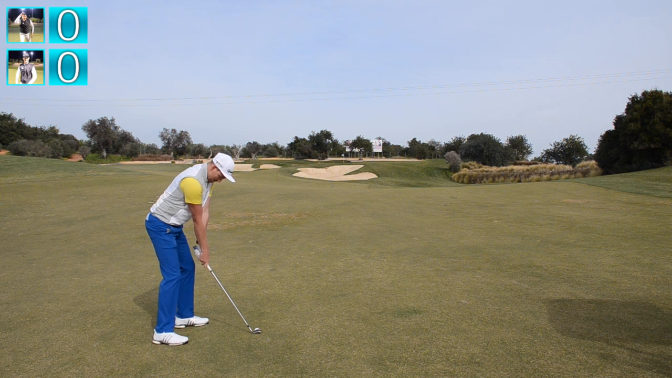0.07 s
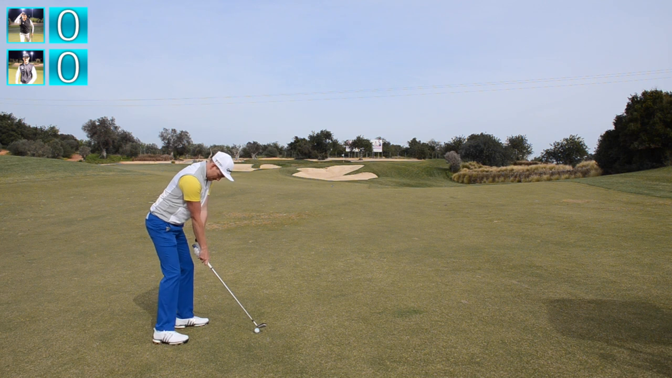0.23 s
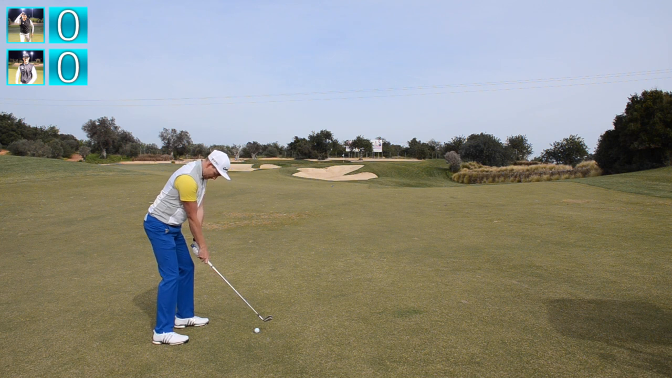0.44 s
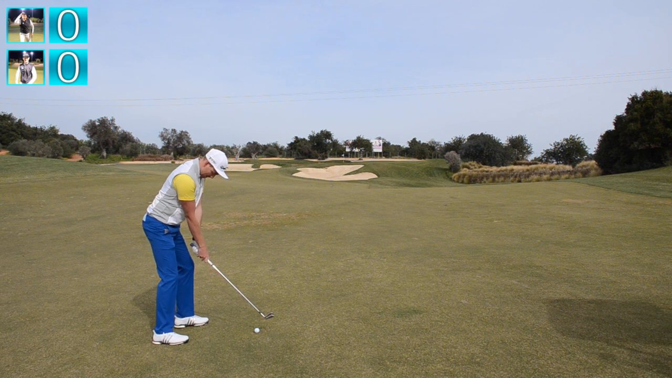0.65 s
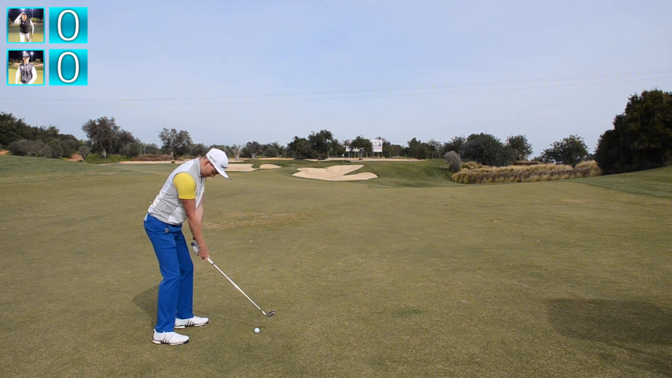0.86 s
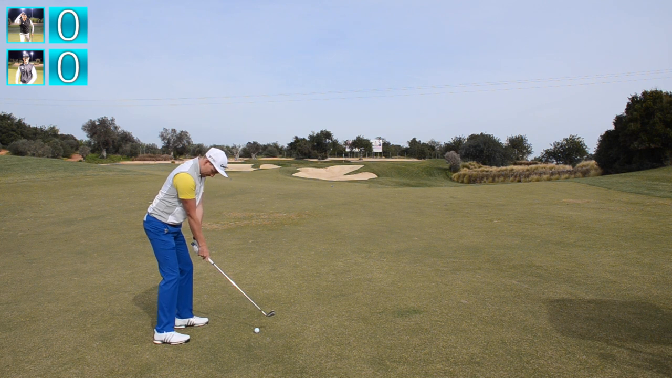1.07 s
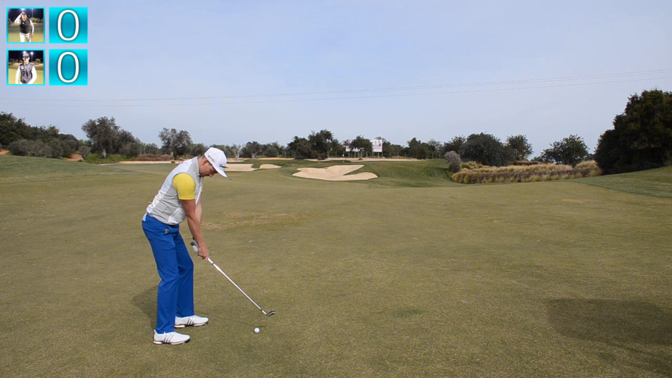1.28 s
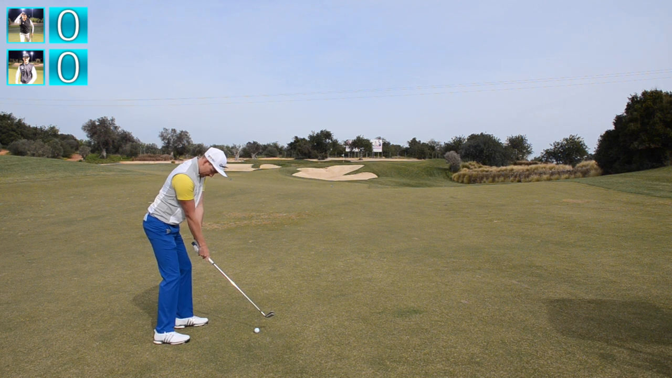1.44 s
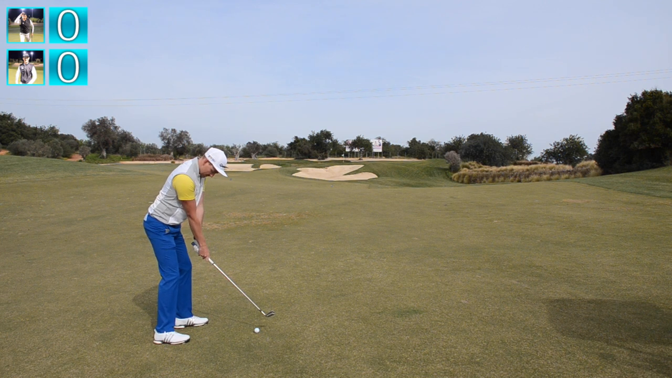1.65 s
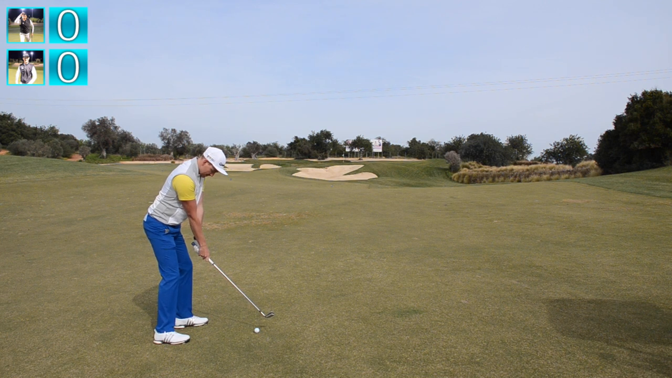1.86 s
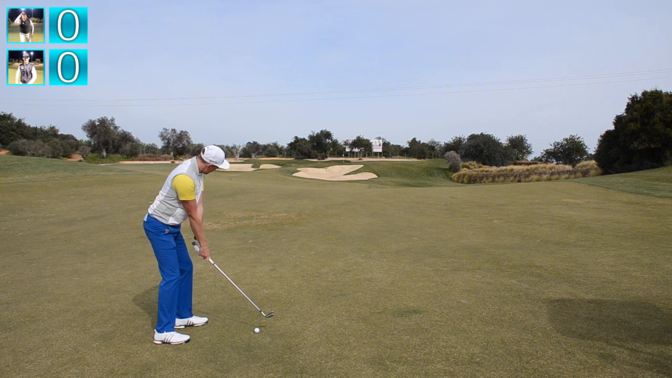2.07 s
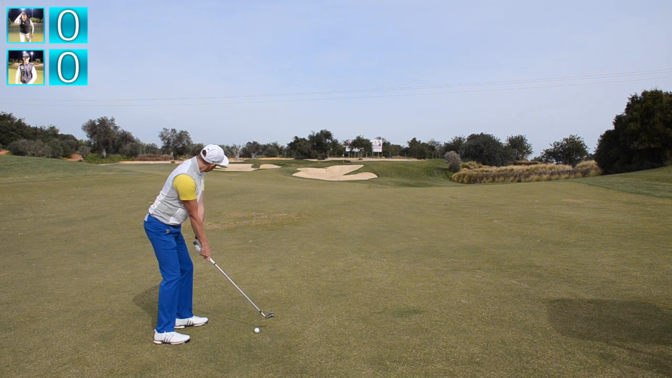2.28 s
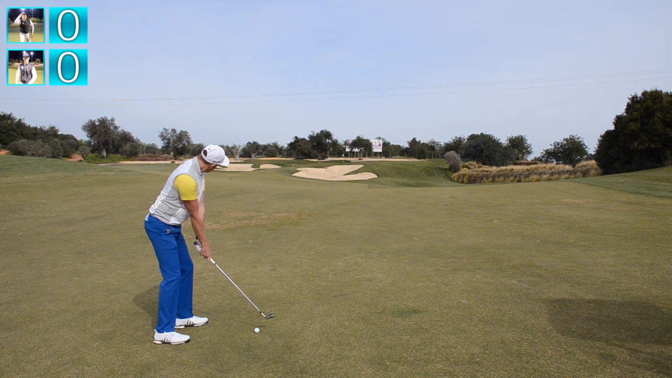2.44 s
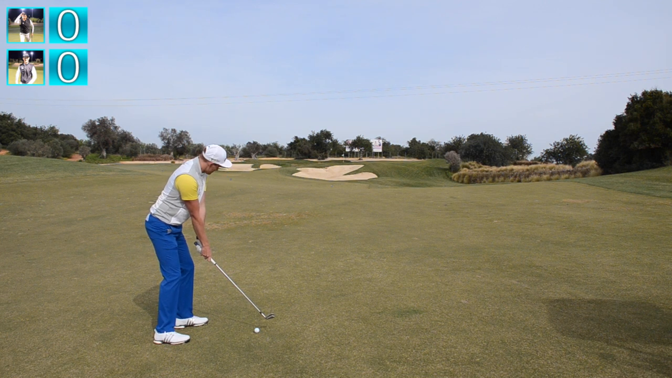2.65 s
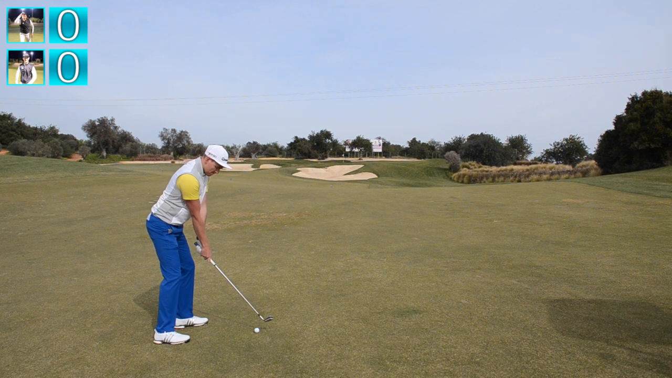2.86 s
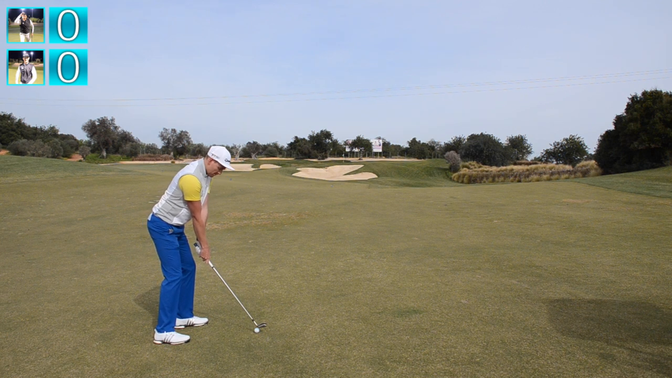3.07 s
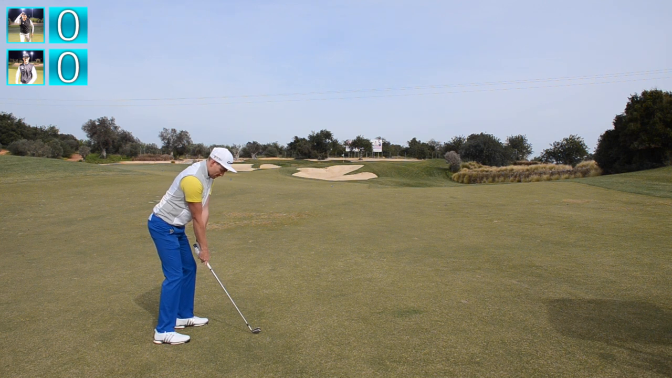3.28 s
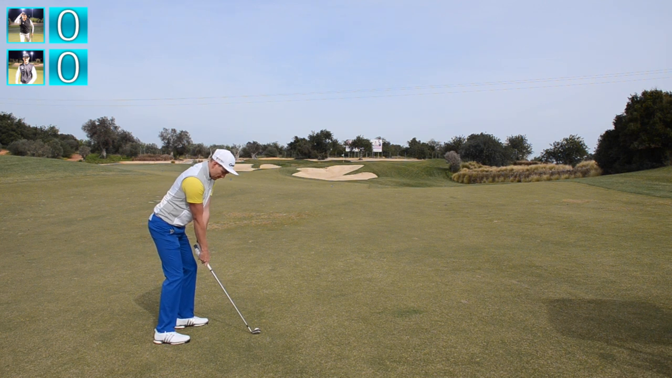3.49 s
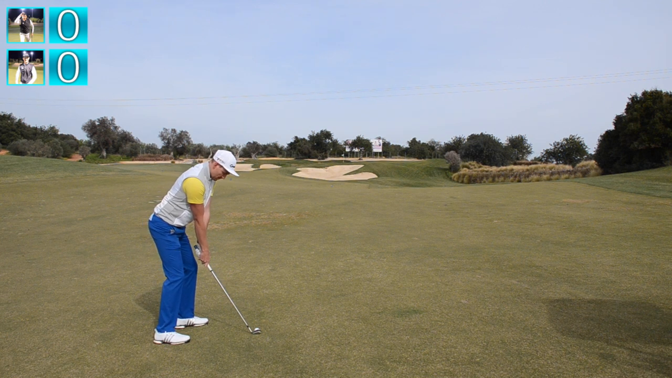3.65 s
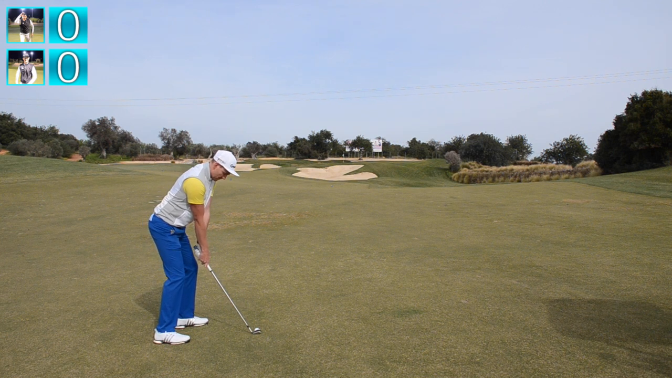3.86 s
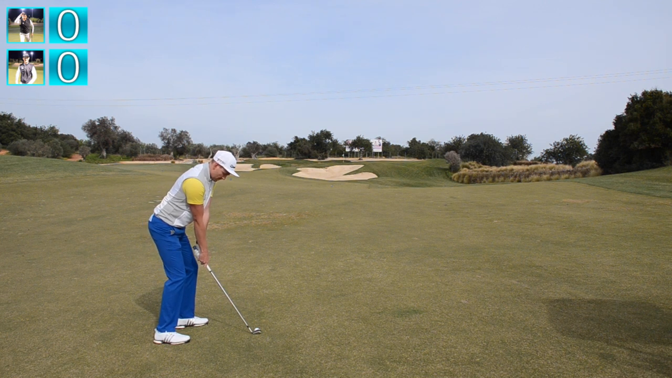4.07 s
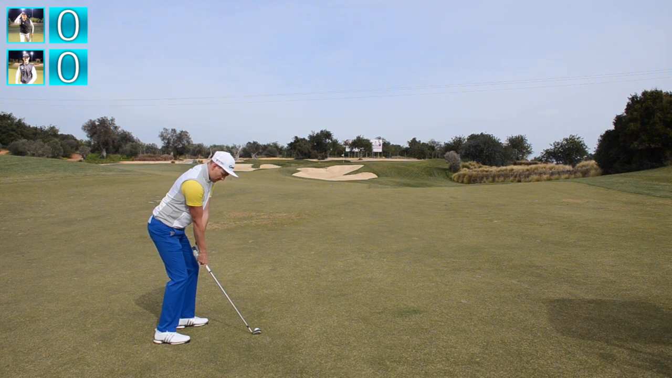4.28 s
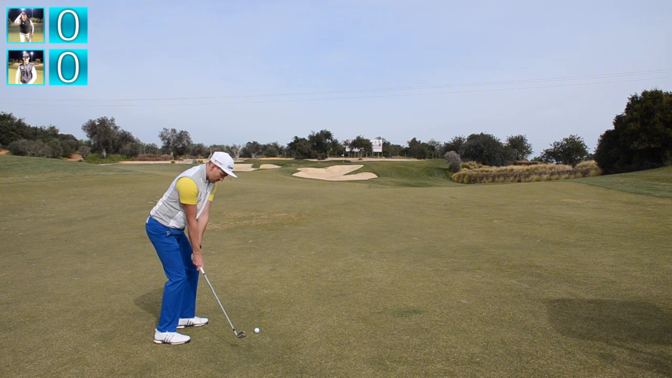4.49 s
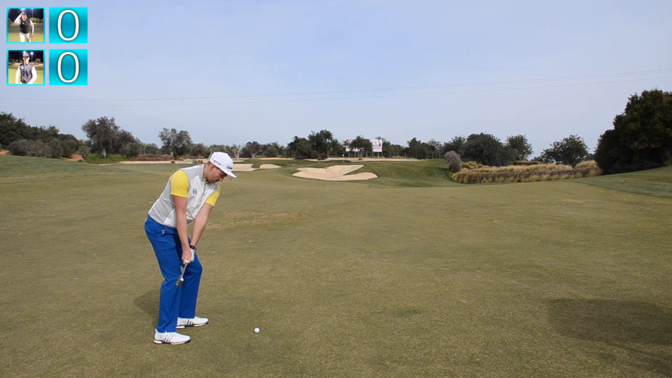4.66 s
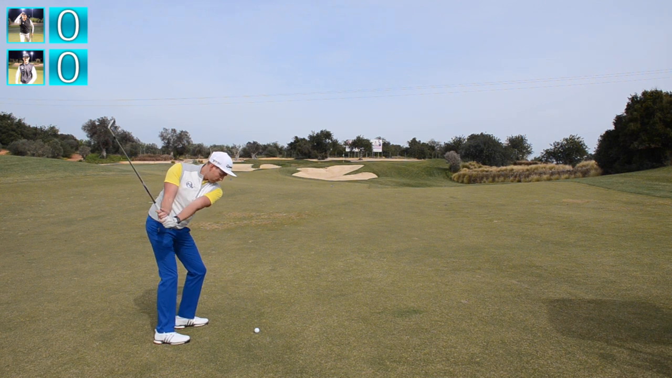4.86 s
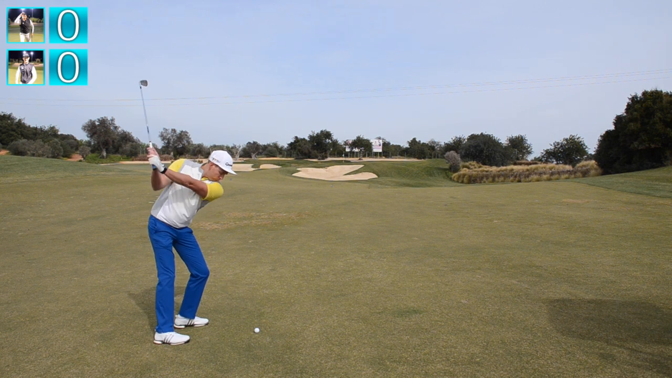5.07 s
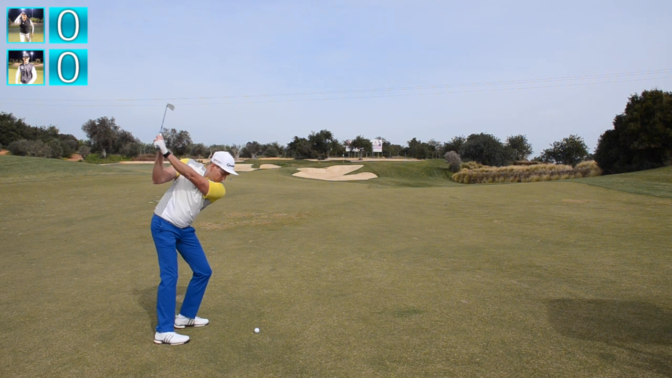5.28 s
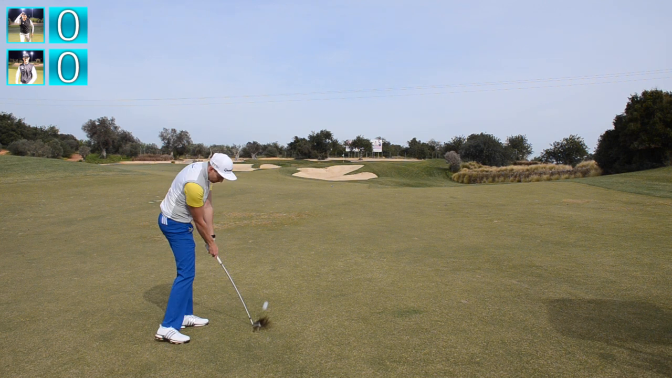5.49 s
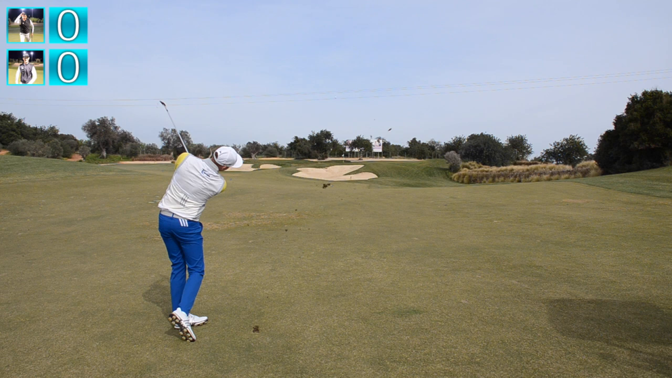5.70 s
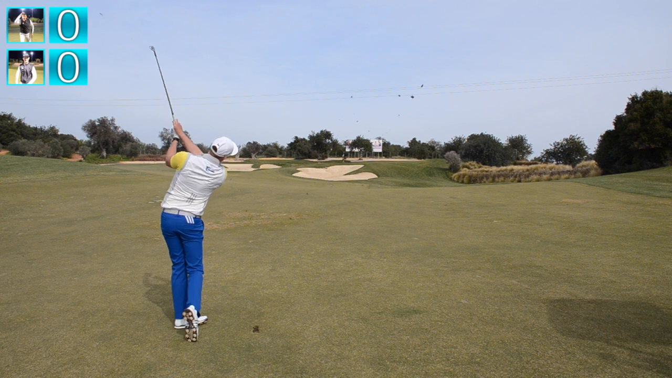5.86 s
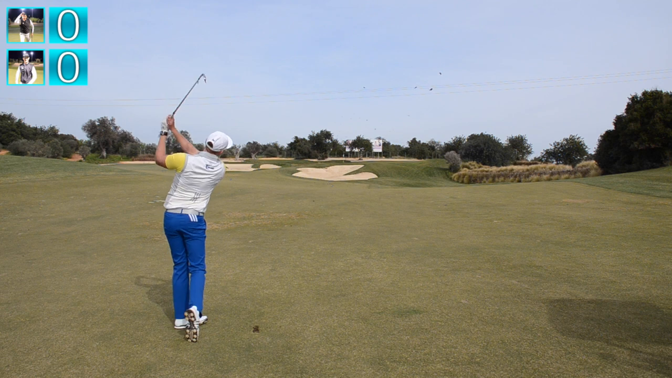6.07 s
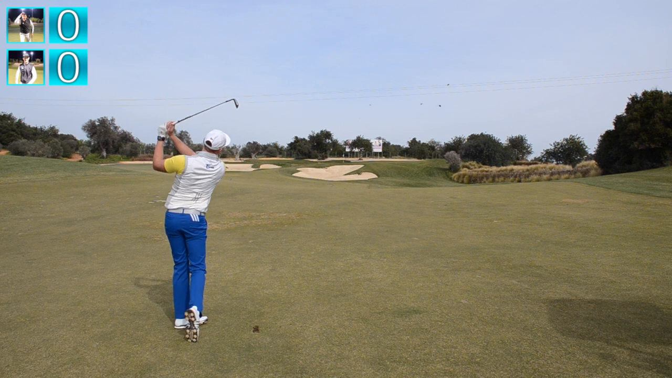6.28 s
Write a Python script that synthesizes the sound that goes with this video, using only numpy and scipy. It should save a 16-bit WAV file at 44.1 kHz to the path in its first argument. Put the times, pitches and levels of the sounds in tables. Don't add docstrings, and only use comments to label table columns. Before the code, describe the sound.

Soft gusts thump, quiet falls on an open fairway, then a quick rising swish, one hard iron crack with turf thud, and a fading whir.

```python
import sys
import numpy as np
from scipy import signal
from scipy.fft import rfft, irfft
from scipy.io import wavfile

SR = 44100
rng = np.random.default_rng(int(sys.argv[2]) if len(sys.argv) > 2 else 0)


def dump_mix(stems):
    frames = np.atleast_2d(stems).T
    limited = np.clip(frames, -1, 1)
    pcm = np.round(limited * 32767).astype(np.int16)
    wavfile.write(sys.argv[1], SR, pcm)


def attenuation_scalar(level_db):
    decades = np.asarray(level_db, float) / 20
    return 10 ** decades


N = 279285
T = np.arange(N) / SR

# time in seconds, strength in dB, contact time in ms.
CONTACTS = [
    (5.58919, -18.0, 0.061),
    (5.58969, -3.8, 0.063),
    (5.59015, 1.8, 0.066),
    (5.59199, -22.0, 0.028),
    (5.59438, -2.0, 0.201),
]


def rms_one(x):
    return x / np.sqrt(np.mean(np.abs(x) ** 2) + 1e-20)


def in_time(rows):
    s, *columns = np.transpose(rows)
    return [np.interp(T, s, column) for column in columns]


def at_hz(points, hz):
    point_hz, point_db = np.array(points).T
    return np.interp(np.log(hz), np.log(point_hz), point_db)


def filtered(x, order, hz, kind):
    return signal.sosfilt(signal.butter(order, hz, kind, fs=SR, output="sos"), x)


def drift(rate):
    r = np.exp(-80 * np.pi * rate / SR)
    slow = signal.lfilter([1], [1, -2 * r, r * r], rng.standard_normal(N // 40 + 2002))[2000:]
    return np.interp(np.arange(N) / 40, np.arange(len(slow)), rms_one(slow))


def ring(clicks, hz, t60):
    r, w = attenuation_scalar(-60 / (t60 * SR)), 2 * np.pi * hz / SR
    return signal.lfilter([0, np.sin(w)], [1, -2 * r * np.cos(w), r * r], clicks + 1e-18)


def whistle(hz, width_hz):
    r = np.exp(-np.pi * width_hz / SR)
    chance = rng.standard_normal(N) + 1j * rng.standard_normal(N)
    wander = signal.lfilter([1], [1, -2 * r, r * r], chance)
    turns = np.cumsum(hz * np.ones(N)) / SR
    return rms_one(np.real(wander * np.exp(2j * np.pi * turns)))


def coloured(spectrum, source):
    hz = np.maximum(np.fft.rfftfreq(N, 1 / SR), 1)
    return rms_one(irfft(rfft(source) * attenuation_scalar(at_hz(spectrum, hz)), N))


def banded_noise(spectrum, patchy_db, width, swell_db):
    out, edges = 0, 14 * 2 ** np.arange(0, 10.6, .5)
    white = rng.standard_normal((2, 2, N))
    for k, (low, high) in enumerate(zip(edges, edges[1:])):
        mid, side = filtered(white[k % 2], 2, [low, high], "band")
        hz = np.sqrt(low * high)
        spread = attenuation_scalar(at_hz(width, hz))
        middle = np.exp(-np.abs(np.log2(hz / 1200) / 1.6) ** 4)
        flicker_db = patchy_db * (0.33 + middle) * drift(7.7)
        gain = attenuation_scalar(at_hz(spectrum, hz) + flicker_db + middle * swell_db)
        out = out + gain * (mid + spread * side * [[1], [-1]])
    return rms_one(out)


def breeze():
    # middle in seconds, level in dB, length in seconds.
    gusts = [(0.027, -44, 0.149), (.18, -34.5, 0.1013), (0.317, -40, 0.0667), (0.522, -48.5, 0.394),
             (0.687, -48, 0.073), (0.923, -46, 0.221), (1.107, -38, 0.172), (1.317, -41.5, 0.1765),
             (1.501, -40, 0.0716), (1.597, -49, 0.0414), (1.82, -55, 0.174), (1.922, -51, 0.036),
             (2.131, -45, 0.0554), (2.288, -51.5, 0.184), (2.601, -45, 0.1695), (2.872, -68, 0.09),
             (3.227, -51.5, 0.026), (3.793, -58, 0.113), (5.103, -66.5, 0.237)]
    # time in seconds, peak in dB, pitch in Hz.
    buffets = [(.17, -29.5, 45), (0.269, -28, 73), (0.663, -32, 45), (0.837, -42, 40), (1.048, -27.5, 47.3),
               (1.2527, -16, 56.6), (1.47, -35, 50), (1.584, -39.5, 60), (1.755, -38.5, 48.4),
               (2.111, -34, 61.7), (2.544, -45, 93.5), (2.608, -33.5, 74.3)]
    # frequency in Hz, level in dB per Hz.
    breeze_colour = [(9, -32.5), (15, -2), (38, -1), (59, -4.5), (101, -9.5), (240, -31), (420, -41.5),
                     (880, -110)]
    level = attenuation_scalar(-64.5)
    for s, db, length in gusts:
        level = level + attenuation_scalar(db) * np.exp(-np.abs(2 * (T - s) / length) ** 1.9)
    out = level * attenuation_scalar(2.6 * drift(13.0)) * coloured(breeze_colour, rng.standard_normal(N))
    length_cycles, cusp, lean_rad = 0.388, 1.08, 0.64
    for s, peak_db, hz in buffets:
        cycles = (T - s - .022) * hz
        bell = np.exp(-np.abs(cycles / length_cycles) ** cusp)
        out += attenuation_scalar(peak_db - 2.0) * np.cos(2 * np.pi * cycles - lean_rad) * bell
    return out


def far_country():
    # frequency in Hz, level in dB per Hz.
    country_colour = [(12, -30.5), (53, -2), (216, -3.5), (350, -9.5), (976, -12), (2990, -21), (5850, -31),
                      (16000, -32.5)]
    # frequency in Hz, side minus mid in dB.
    side_width = [(60, -17.5), (150, -15), (380, -7), (800, -6), (1290, -4.5), (2380, -3.5), (5000, -0.5),
                  (15000, -0.5)]
    # time in seconds, lift in dB.
    murmur = [(0, 2.5), (1.1, 2), (1.5, 1), (4.6, 0), (4.9, 2), (5.4, 2.5), (6.33, 1.5)]
    return attenuation_scalar(-57) * banded_noise(country_colour, 1.2, side_width, in_time(murmur)[0])


def far_sounds():
    # middle in seconds, length in seconds, pitch in Hz, width in Hz, level in dB.
    far_calls = [(0.414, 0.0295, 2550, 150, -66), (0.491, 0.033, 2150, 220, -71),
                 (0.641, 0.096, 3100, 700, -68), (.63, 0.098, 2450, 400, -72),
                 (0.822, 0.084, 2498, 1200, -66.5), (0.989, 0.183, 2209, 1500, -66.5),
                 (1.737, 0.014, 3100, 900, -62), (1.845, 0.0203, 2071, 120, -60.5),
                 (4.145, 0.073, 2990, 500, -68.5), (4.859, 0.014, 2600, 1500, -60),
                 (6.15, 0.0282, 1404, 200, -62.5), (6.24, .11, 1500, 160, -60.5),
                 (6.321, 0.026, 1498, 140, -61)]
    out = 0
    for s, length, hz, width_hz, db in far_calls:
        bell = np.exp(-np.abs(2 * (T - s) / length) ** 4)
        out = out + attenuation_scalar(db) * whistle(hz, width_hz) * bell
    return out * attenuation_scalar([[-1.5], [1.5]])


def swing():
    # time in seconds, vortex shedding in Hz, tone in dB.
    downswing = [
        (5.42, 290.1, -73),
        (5.495, 334.3, -57.5),
        (5.53, 391.9, -41),
        (5.548, 479.2, -38.5),
        (5.563, 620, -35),
        (5.59, 603.3, -31.5),
    ]
    # time in seconds, vortex shedding in Hz, tone in dB.
    follow = [
        (5.59, 638.2, -54),
        (5.64, 711.6, -48),
        (5.7, 679.1, -47.5),
        (5.79, 548.5, -54),
        (5.88, 431.5, -57),
        (5.98, 340, -62),
        (6.33, 320, -63),
    ]
    # multiple of the pitch, level in dB, width in Hz.
    shedding = [(1, 0.5, 210), (1.88, -5.5, 240), (2.75, -8, 300)]
    # frequency in Hz, level in dB per Hz.
    rush_colour = [(150, -9), (400, 5), (900, 1), (1800, -1), (3300, -7), (4300, -22), (8000, -41),
                   (15000, -50.5)]
    full_speed_hz = 620
    hz, tone_db = in_time(downswing + follow)
    after = T > follow[0][0]
    octaves = np.log2(hz / full_speed_hz)
    rush_db = tone_db + np.where(after, -1.77 + 3.6 * octaves, .5 + 12.2 * octaves)
    hz = hz * (1 + 0.25094 * after * np.clip(-octaves, 0, 1) * np.tanh(drift(13.0)))
    tone = 0
    for k, db, width_hz in shedding:
        growth = (hz / full_speed_hz) ** (0.4 * (k - 1))
        tone = tone + attenuation_scalar(db) * growth * whistle(k * hz, width_hz)
    rush = attenuation_scalar(2.0 * drift(110)) * coloured(rush_colour, rng.standard_normal(N))
    return (T > downswing[0][0]) * (attenuation_scalar(tone_db) * tone + attenuation_scalar(rush_db) * rush)


def contact_push():
    push = 0
    for s, db, ms in CONTACTS:
        push = push + attenuation_scalar(db) * np.exp(-((T - s) * 700 / ms) ** 2) / (ms * SR / 400)
    return push


def head_click(push):
    # frequency in Hz, level in dB, t60 in seconds.
    head_modes = [(432, -29, .04), (660, -20.5, .04), (815, -10.5, .022), (1026, -9.5, .014),
                  (1370, -17.4, .027), (1580, -11.1, .014), (1911, -25, .03), (2097, -10, .0036),
                  (2478, -14.7, .009), (2921, -15.3, .014), (3170, -13, .026), (3370, -19, .022)]
    click = 0
    for hz, db, t60 in head_modes:
        click = click - attenuation_scalar(db + 2.5) * np.gradient(ring(push, hz, t60)) * SR / (2 * np.pi * hz)
    return click


def ground_thud(push):
    # frequency in Hz, level in dB, t60 in seconds.
    soil_modes = [(76, -41, .42), (100, -47, .15), (152, -30, .12), (220, -21.5, .065)]
    return -sum(attenuation_scalar(db) * ring(push, hz, t60) for hz, db, t60 in soil_modes)


def torn_turf():
    # frequency in Hz, level in dB per Hz.
    spray_colour = [(200, -8.5), (800, 7.5), (2500, 7.5), (3600, -2), (4600, -11.5), (7000, -15),
                    (12000, -26), (16000, -25)]
    start_s, attack_s, hold_s = 5.5895, 0.0013, 0.0119
    since = np.maximum(T - start_s, 0)
    grains = rng.standard_normal(N) * attenuation_scalar(3.8 * rng.exponential(1, N))
    spray = filtered(coloured(spray_colour, grains), 2, 90, "high")
    tearing = attenuation_scalar(-25.5 - 200 * since - 5400 * np.maximum(since - hold_s, 0))
    dust = attenuation_scalar(-39 - 450 * since) * filtered(spray[::-1], 4, 3600, "low")
    soil = rms_one(filtered(rng.standard_normal(N), 2, [55, 140], "band"))
    rumble = attenuation_scalar(-38 - 170 * since) * np.minimum(since / .015, 1) * soil
    return rumble + np.minimum(since / attack_s, 1) ** 2 * (tearing * spray + dust)


def face_crack():
    # frequency in Hz, level in dB, t60 in seconds.
    face_modes = [(4035, -16.0, 0.0038), (6036, -29.3, 0.0109), (8533, -16.0, 0.0013),
                  (10292, -19.8, 0.002), (12970, -25.2, 0.0017)]
    release = 1. * (np.arange(N) == round(5.5899 * SR))
    crack = 0
    for k, (hz, db, t60) in enumerate(face_modes):
        crack = crack + (-1) ** k * attenuation_scalar(db) * ring(release, hz, t60)
    return crack


def blow():
    push = contact_push()
    return head_click(push) + ground_thud(push) + torn_turf() + face_crack()


def scene():
    air = breeze() + far_country() + far_sounds()
    club = swing() + blow()
    late = np.roll(club, 3) - club
    return air + club + attenuation_scalar(-46.5) * late * [[1], [-1]]


def roll_off(x):
    return signal.sosfilt(signal.butter(12, 16370, fs=SR, output="sos"), x)


def record(dry):
    heard = filtered(dry, 2, 31.8, "high")
    heard = signal.sosfilt(signal.cheby2(16, 50, 16100, fs=SR, output="sos"), heard)
    since = T - CONTACTS[1][0] - .006
    attack_s, release_s = 0.0032, 0.0863
    duck_db = -9.5 * np.clip(since / attack_s, 0, 1) * np.exp(-np.maximum(since, 0) / release_s)
    return roll_off(np.clip(heard * attenuation_scalar(duck_db), -1, 1))


dry = scene()
out = record(dry)
dump_mix(out)
```